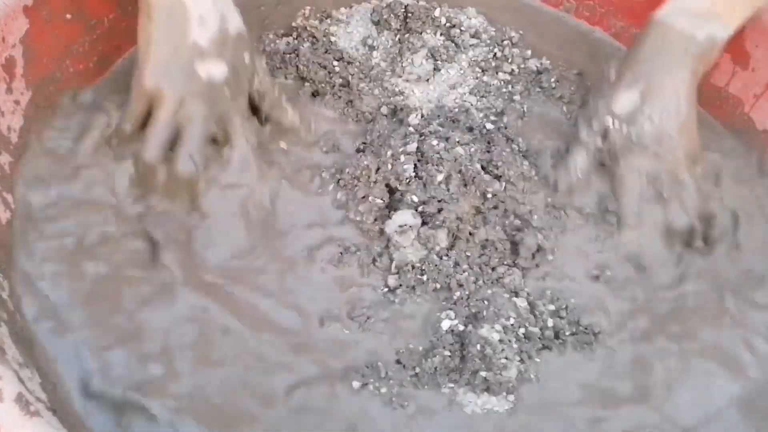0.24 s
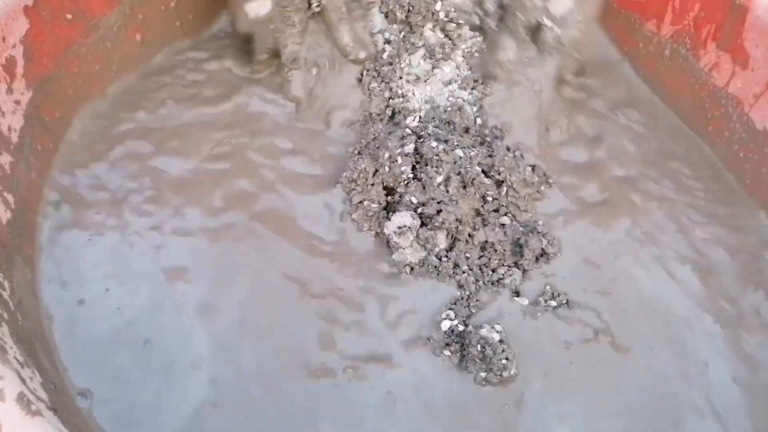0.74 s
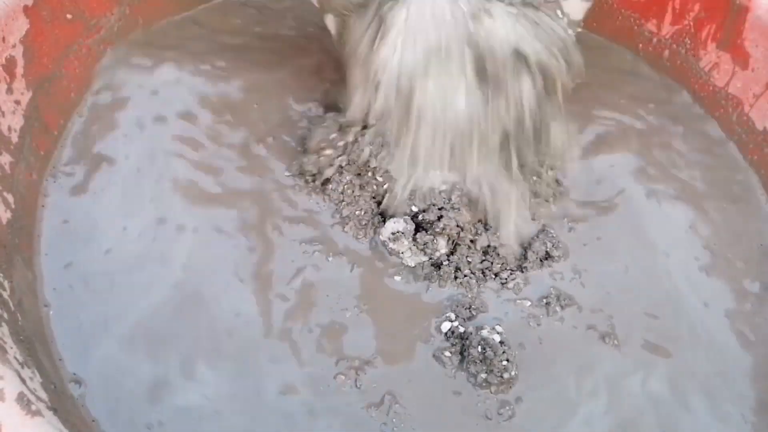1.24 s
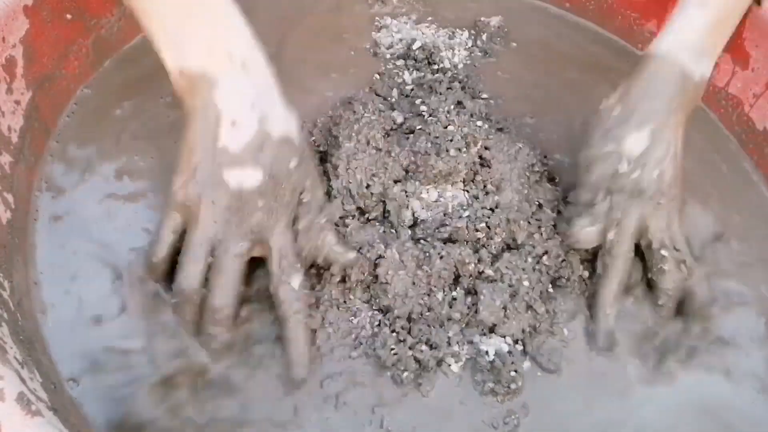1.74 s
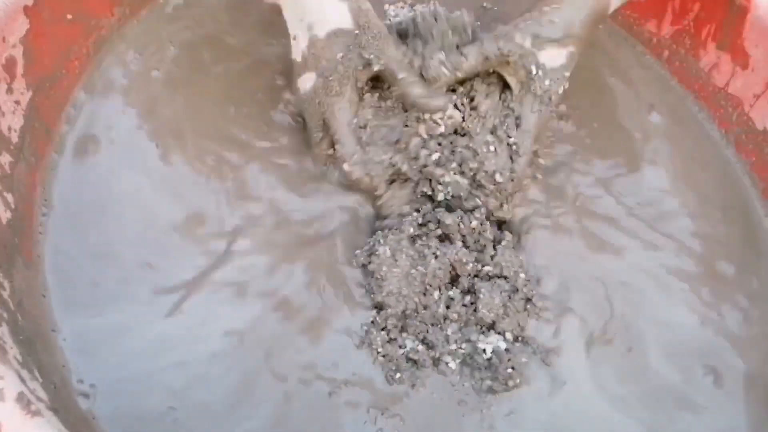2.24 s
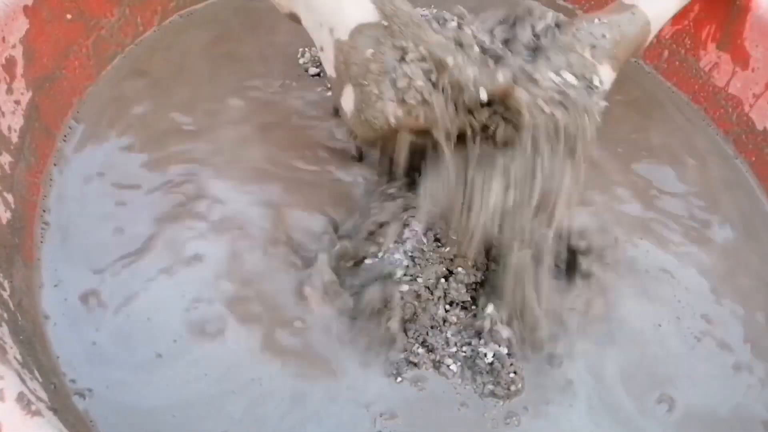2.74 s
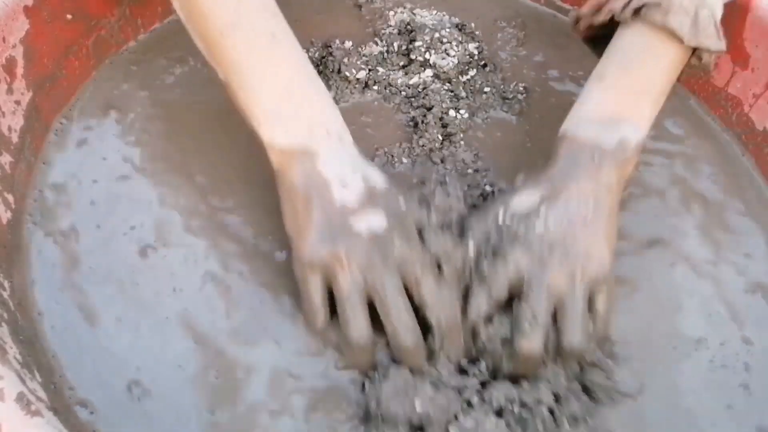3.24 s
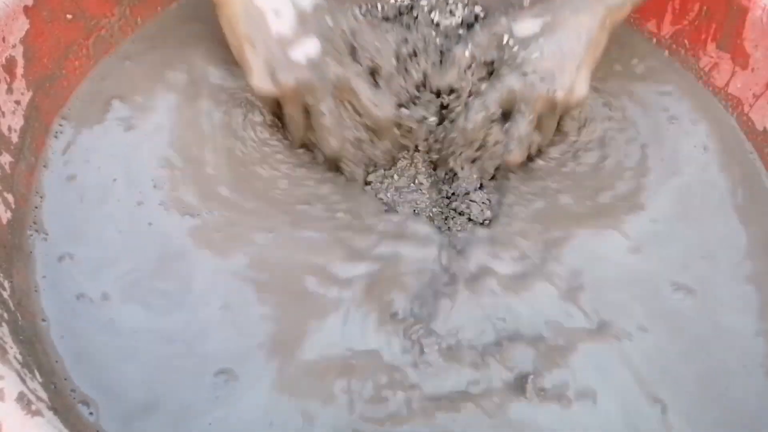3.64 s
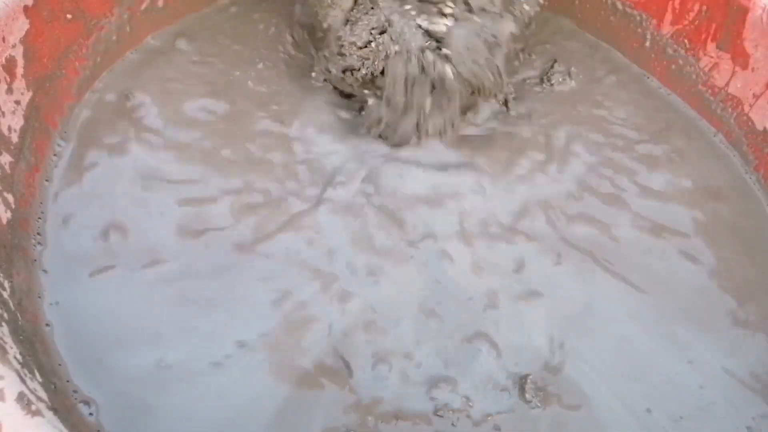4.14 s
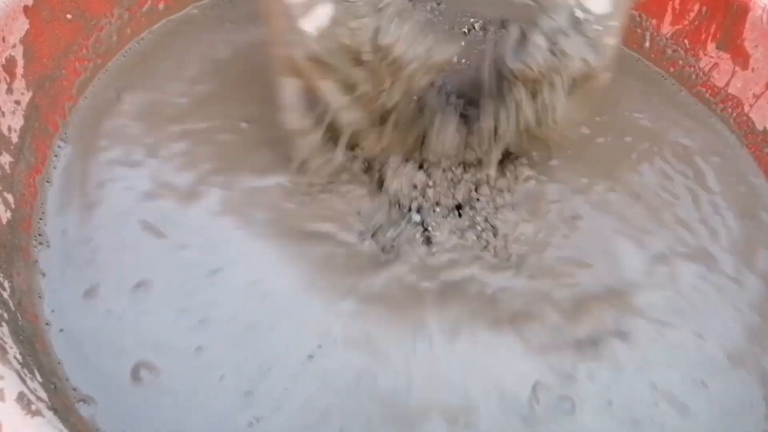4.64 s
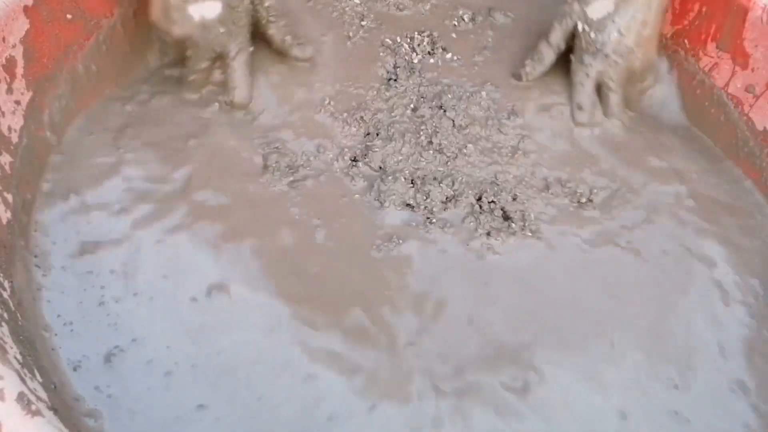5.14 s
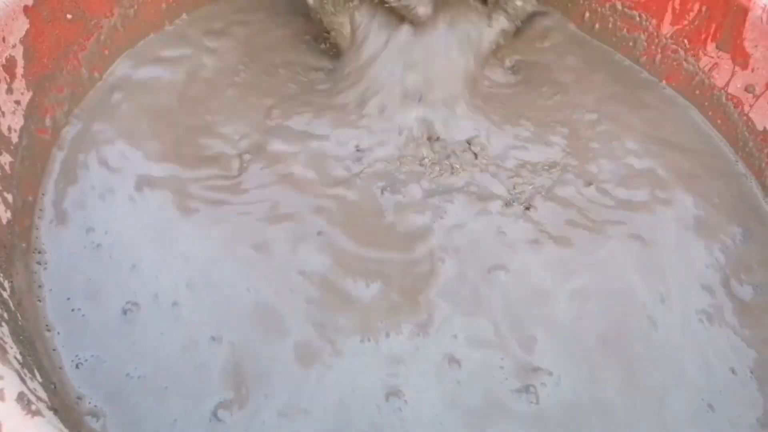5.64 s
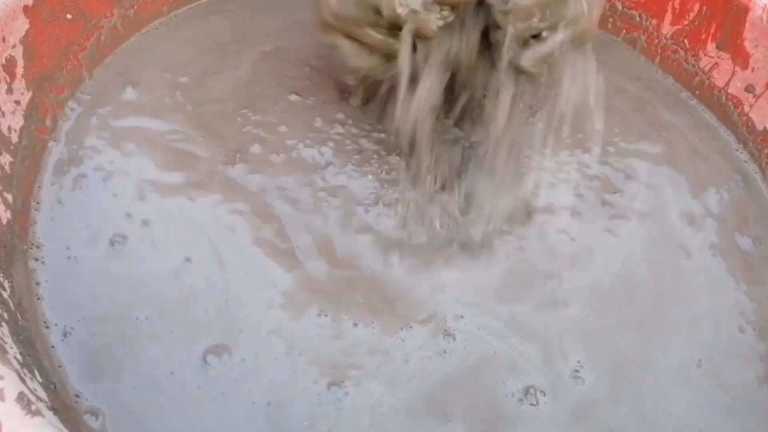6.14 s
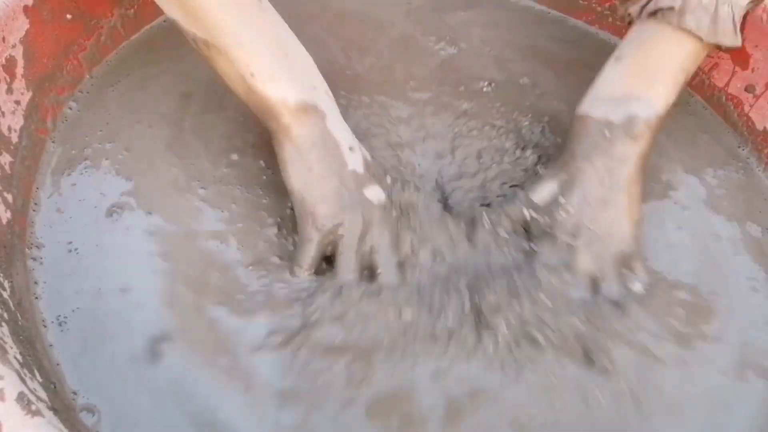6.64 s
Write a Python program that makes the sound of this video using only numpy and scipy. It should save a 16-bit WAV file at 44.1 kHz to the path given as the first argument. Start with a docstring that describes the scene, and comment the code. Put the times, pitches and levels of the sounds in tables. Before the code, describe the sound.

Close sloshing and gulping of muddy water as handfuls of grainy sand pour in, over a low, wavering far-off motor hum.

```python
"""Gritty sand in a basin of muddy water

Close to the microphone, hands lift wet sand out of a basin and crumble it back in, again and again.
Moving resonances slosh and froth, ringing bubbles plop and gulp, filtered noise and clicks hiss as grains.
Far off, two engines drone as sums of orders and drift in speed; rumble and open air lie behind them.
The microphone has two closely spaced ports, partly alike in what they hear."""
import sys
import numpy as np
from scipy import signal
from scipy.fft import rfft, irfft
from scipy.io import wavfile
from scipy.ndimage import uniform_filter1d

SR = 44100
rng = np.random.default_rng(int(sys.argv[2]) if len(sys.argv) > 2 else 0)


def to_wav(sig):
    """Store sig (one row per channel, or 1-D mono) as 16-bit WAV at the path in sys.argv[1].

    Samples outside -1..1 are clipped; the rate is SR.
    """
    pcm = np.clip(np.atleast_2d(sig), -1, 1) * 32767
    pcm = np.round(pcm).astype(np.int16)
    wavfile.write(sys.argv[1], SR, pcm.T)  # frames by channels


N = 303849
TIME = np.arange(N) / SR  # s

# Handfuls of grains raining on the water:
# [full flow t/s, relative level/dB, rise/s, hold/s, fall/s, left minus right/dB]
POURS = [(0.0, -30, .1, 0.052, 0.079, -1.5), (0.148, -32, 0.13, 0.085, 0.12, -3.5),
         (0.85, -44.5, 0.99, 0.062, 0.44, -8), (1.325, -32, 0.52, 0.35, 0.54, -1.5),
         (1.966, -50, 0.15, 0.036, 1, -17), (2.606, -29.5, 0.34, 0.42, 0.17, -2.5),
         (3.171, -32.5, 0.18, 0.011, 0.038, -3), (3.439, -28, 0.13, 0.17, 0.15, -3),
         (3.904, -41.5, 0.63, 0.038, 0.097, -8.5), (4.551, -29.5, 0.61, 0.2, 0.23, -3.5),
         (5.433, -46.5, 0.6, 0.041, 0.92, -7), (5.987, -30.5, 0.31, 0.31, 0.24, -1.5),
         (6.465, -40, 0.2, 0.12, 0.34, -4)]
STRAY_DB = -54  # grains that keep falling from the fingers
TRICKLE_DB, TRICKLE_STRETCH = -30, 1.4  # trickle against its pour, and how many times slower it sets in
LOOSEN_DB_PER_S = 10.5  # the flow grows as the handful falls apart

# Sand plunging in and frothing: [height t/s, relative level/dB, rise/s, fall/s, ring of the bubble cloud f/Hz]
PLUNGES = [(0.02, -39.5, 0.11, 0.15, 2240), (0.27, -38.5, 0.22, 0.22, 2100), (1.35, -36, 0.88, 0.96, 2870),
           (2.08, -36.5, 0.23, 0.14, 1600), (2.57, -30.5, 0.11, 0.28, 1400), (2.71, -30.5, 0.47, 0.4, 2800),
           (3.16, -31.5, 0.13, 0.11, 1890), (3.39, -27, 0.056, 0.68, 1740), (3.54, -25.5, 0.24, 0.32, 2680),
           (3.95, -45, 0.092, 0.28, 2900), (4.27, -34.5, 0.078, 0.14, 1480), (4.49, -28, 0.42, 0.45, 3020),
           (5.6, -41, 0.35, 0.34, 2000), (6.025, -30.5, 0.32, 0.28, 2630), (6.61, -38, 0.36, 0.19, 1260)]
FROTH_OCTAVES_PER_S = 1  # the large bubbles burst first

# A hand pushing the water about: [height t/s, level/dB, rise/s, fall/s, centre of the gurgle f/Hz]
SLOSHES = [(0.7, -35.5, 0.62, 0.63, 730), (1.3, -39.5, 0.52, 0.29, 540), (2.13, -39, 0.4, 0.8, 676),
           (2.561, -38.5, 1, 0.37, 690), (3.38, -39.5, 0.37, 0.23, 895), (3.6, -38.5, 0.97, 0.35, 544),
           (4.0, -41, 0.97, 0.48, 880), (4.34, -36, 0.27, 0.41, 560), (5.31, -35.5, 0.44, 0.61, 1010),
           (5.8, -42, 0.5, 0.55, 850), (6.87, -44, 0.64, 0.52, 674)]
GURGLE_OCTAVES_PER_S = .7  # the gurgle climbs as the hand comes up
LAPPING_DB, LAPPING_HZ = -53, 880  # the water never quite settles
ROUNDNESS = 1.065  # above 1 a gesture has a rounder top and steeper ends

# Water closing over a pocket of air, which breaks into bubbles of one size:
# [height t/s, level/dB, fall/s, pitch f/Hz]
GULPS = [(0.66, -41, 0.38, 866), (0.83, -37, 0.13, 955), (1.342, -34, 0.065, 1540),
         (1.38, -38.5, 0.18, 1200), (1.42, -42.5, 0.35, 1956), (2.083, -41, 0.078, 2430),
         (2.48, -40, 0.2, 1485), (3.378, -28.5, 0.093, 1292), (3.444, -30, 0.18, 2603),
         (3.527, -26.5, 0.041, 2640), (4.46, -35, 0.19, 1590), (4.491, -37.5, 0.15, 1191),
         (5.16, -37, 0.12, 522), (5.19, -38.5, 0.24, 890), (5.365, -40, 0.044, 2444),
         (5.35, -35, 0.2, 1075), (5.525, -34, 0.061, 960), (6.125, -39, 0.22, 2790)]
GULP_WIDTH, GULP_BUBBLES_PER_S = 0.26, 450  # width of the ring as a share of its pitch
GULP_RISE = 1  # rise time as a share of the fall time

# Lumps that trap a pocket of air: [t/s, peak level before echoes/dB, pitch f/Hz]
PLOPS = [(0.1505, -29, 3270), (0.225, -23, 2250), (0.226, -30, 1750), (0.2927, -22.5, 3300),
         (0.293, -30, 1410), (1.341, -19, 1474), (2.059, -29.5, 1300), (3.342, -17, 1267),
         (3.391, -22, 1120), (3.436, -23.5, 1210), (4.603, -22, 1470), (5.2975, -24, 925),
         (5.807, -32, 3650), (6.02, -26.5, 1460), (6.251, -37, 1480)]

# Crumbs snapping and spattering: [t/s, relative level/dB, decay of the spray/s]
SNAPS = [(0.0238, -10.5, .0007), (0.057, -17, 0.0054), (0.067, -9, .0014), (0.2776, -24.5, .002),
         (0.4144, -30.5, .002), (1.338, -19, 0.007), (1.352, -15.5, .0028), (1.4172, -20.5, .005),
         (1.508, -18.5, 0.0045), (1.6323, -23, .004), (1.849, -18.5, 0.0021), (2.973, -19.5, 0.013),
         (4.719, -20.5, .009), (6.2196, -16, 0.0076), (6.2497, -13.5, 0.0031), (6.195, -26, 0.018),
         (6.265, -28, 0.019), (6.345, -24, .008)]

# Speed of the engine that gathers pace throughout: [t/s, turning rate f/Hz]
CLIMBING_SPEED = [(0.0, 30.2), (0.72, 32.0), (1.7, 33.7), (2.5, 35.1), (3.9, 36.6), (4.8, 37.8),
                  (6.88, 38.9)]
# Its boom, swelling and shifting among the low orders: [t/s, level/dB, centre of the boom f/Hz]
CLIMBING_BOOM = [(0.0, -41.5, 92), (0.3, -28.5, 87.7), (0.57, -23, 86), (0.68, -28, 183.6),
                 (1.06, -26.5, 135.5), (1.32, -29.5, 163), (1.42, -36.5, 148), (1.72, -27, 174),
                 (1.96, -41, 166), (2.44, -26, 174), (3.15, -44.5, 168), (3.35, -26.5, 165),
                 (3.6, -37, 174), (4.1, -33, 191), (5.502, -36, 183), (6.3, -42, 196), (6.779, -32, 176)]
# Speed of the engine that comes in later and slows down: [t/s, turning rate f/Hz]
SLOWING_SPEED = [(1.6, 32.0), (1.96, 30.8), (2.28, 30.5), (3.4, 28.2), (4.52, 25.7), (5.4, 22.5),
                 (5.8, 22.0)]
# Its boom: [t/s, level/dB, centre of the boom f/Hz]
SLOWING_BOOM = [(1.5, -52, 125), (1.72, -23, 127), (1.95, -27.5, 122), (2.13, -21, 120),
                (2.371, -27, 137.6), (2.52, -37.5, 148), (2.72, -30.5, 154), (3.031, -34, 116),
                (3.2, -29, 92), (3.37, -24.5, 133.5), (3.68, -36, 125), (3.83, -26, 124), (3.98, -27, 119),
                (4.13, -20.5, 137), (4.36, -26.5, 113), (4.7, -32.5, 133), (5.2, -31.5, 107),
                (6.0, -40.5, 110)]
# Orders of both engines: [multiple of the turning rate, level outside the boom/dB]
ENGINE_ORDERS = [(2, -14), (3, 1), (4, 2.5), (5, -1), (6, -7), (7, -20), (8, -14), (9, -15)]
BOOM_OCTAVES, BOOM_DB = 0.13, 11.5  # width of the boom, and how far it lifts an order
ENGINE_LOW_CUT_HZ = 83  # orders that sink below this fade

# Spectral colours of grains, bubbles, stirred water, exhaust and open air: [f/Hz, relative level per Hz/dB]
GRIT_COLOUR = [(1470, -63), (2500, -22), (3130, -7.5), (3790, -14), (4260, -13.5), (5320, -4.5), (6560, 2),
               (7190, 6), (7770, 0.5), (8590, 1.5), (9950, -7), (10800, -11.5), (12900, -15.5),
               (14700, -19), (15800, -15)]
FROTH_COLOUR = [(450, -37), (850, 0), (1200, 0.5), (1950, 0), (2700, 0), (3350, 1.5), (3800, -7.5),
                (5300, 2.5), (7500, -22), (12000, -45)]
SLOSH_COLOUR = [(340, 5), (470, 6.5), (650, 5), (950, 3), (1250, -0.5), (1700, -8), (3000, -9), (6000, -27)]
RUMBLE_COLOUR = [(25, -15.5), (52, -2.5), (68, -5.5), (110, -1.5), (160, -2.5), (205, -3), (250, -19.5),
                 (330, -16.5), (600, -47.5)]
AIR_COLOUR = [(160, 4), (280, 7), (399, -26), (696, -6), (2730, -7), (4030, -15), (7030, -8), (10900, -61),
              (14800, -46), (15800, -39)]

# How alike the two ports hear: [f/Hz, likeness 0-1]
PORT_LIKENESS = [(120, .78), (250, .8), (500, .62), (1200, .68), (2500, .48), (5000, .48), (7000, .72),
                 (12000, .86)]
# Balance of the two ports: [f/Hz, left minus right/dB]
PORT_BALANCE = [(100, -2.5), (1500, -2.5), (2600, 0.5), (3600, -0.5), (5000, 0), (6500, -6), (7400, 1.5),
                (7750, 0), (8600, 12.5), (10000, 4.5), (13000, 2.5)]
EDGE_HZ = 15800  # upper band limit of the recorder


def grit(level_db, pan_db):
    """Wet grains hiss and raise tiny bubbles, dry ones prickle; each falls in its own uneven clumps."""
    fizz = bubbles(4000, 12000, per_s=1200, cycles=16, rise=.02, spread_db=1.2, count=14)
    wet = coloured(rng.standard_normal((2, N)) + 0.36 * fizz, GRIT_COLOUR)
    wet = wet * amp(-2.0 + 1.84 * drift(rate_hz=25))
    dry = dry_grains(impacts(per_s=2200, spread_db=1.0))
    dry = dry * amp(-3.5 + 1.6 * drift(rate_hz=60))
    return (wet + dry) * amp(level_db + np.array([pan_db, -pan_db]) / 2)


def sand_flow():
    """Level and side (dB) of the falling grains: each handful trickles, pours and runs out."""
    power = np.full(N, amp(STRAY_DB) ** 2)
    side = np.zeros(N)
    for s, db, rise, hold, fall, side_db in POURS:
        loosen_db = LOOSEN_DB_PER_S * (np.clip(TIME - s, 0, hold) - hold / 2)
        pour = swell(TIME, s, rise, fall, hold)
        trickle = amp(TRICKLE_DB) ** 2 * swell(TIME, s, rise * TRICKLE_STRETCH, fall, hold)
        part = amp(db + loosen_db) ** 2 * (pour + trickle)
        power = power + part
        side = side + part * side_db
    return 10 * np.log10(power), side / power


def dry_grains(x):
    """Dry grains strike more brightly than wet ones."""
    return coloured(x - 0.71 * np.roll(x, 1, axis=1), GRIT_COLOUR)


def froth():
    """Plunging sand sheds its air as a swarm of small bubbles."""
    cloud = bubbles(927.6, 5766, per_s=4500, cycles=9.3, rise=0.017, spread_db=0.1, count=28)
    swarm = cloud + 1.6 * impacts(12000, spread_db=1.6)
    moving = churn(swarm, FROTH_COLOUR, PLUNGES, FROTH_OCTAVES_PER_S,
                   ring_db=3.5, octaves=0.57, patchy_db=2.5)
    return amp(-3.0) * moving


def slosh():
    """The hands drag through the water and fold large bubbles into it; a few ring on as gurgles."""
    cloud = bubbles(281.6, 3094, per_s=2500, cycles=3.55, rise=0.098, spread_db=0.5, count=24)
    gurgles = bubbles(451.7, 2665, per_s=350, cycles=14.9, rise=0.0373, spread_db=1.0, count=16)
    stirred = .5 * cloud + .25 * gurgles + rng.standard_normal((2, N))
    moving = churn(stirred, SLOSH_COLOUR, SLOSHES, GURGLE_OCTAVES_PER_S,
                   ring_db=5.5, octaves=0.66, patchy_db=1.0)
    return moving * amp([[1.7], [-1.7]])  # leans left


def gulps():
    """Bubbles of one size are born unevenly and ring together; their pitch climbs as they rise."""
    out = np.zeros((2, N))
    t = np.arange(SR) / SR - .5
    for s, db, fall, hz in GULPS:
        born = rng.random((2, SR)) < GULP_BUBBLES_PER_S / SR
        births = np.exp(2j * np.pi * rng.random((2, SR))) * born  # each with its own phase
        keep = np.exp(-np.pi * GULP_WIDTH * hz / SR)
        rings = signal.lfilter([1], [1, -2 * keep, keep ** 2], births)
        rings = rings / (abs(rings) + 1e-9) ** .5  # the pocket feeds them at an even pace
        turns = np.cumsum(hz * 2 ** (GURGLE_OCTAVES_PER_S * t)) / SR
        ring = unit((rings * np.exp(2j * np.pi * turns)).real)
        envelope = np.sqrt(swell(t, 0, GULP_RISE * fall, fall))
        add(out, s + t[0], amp(db) * envelope * ring)
    return np.sqrt(2) * irfft(ports(rfft(out), np.fft.rfftfreq(N, 1 / SR)), N)


def plops():
    """Each lump opens one large bubble, then a short flurry of bubbles of nearly the same size."""
    out = np.zeros((2, N))
    for s, db, hz in PLOPS:
        flurry = np.zeros((2, SR // 4))
        add(flurry, 0, np.ones((2, 1)) * bubble(hz, cycles=6.6, rise=0.0057))
        for delay, (size, left, right) in zip(rng.gamma(2, size=14), rng.standard_normal((14, 3))):
            port_gain = 1 + 1.24 * np.array([[left], [right]])
            small = bubble(hz * 1.15 ** size, cycles=5, rise=0.01)
            add(flurry, delay * .006, .45 * np.exp(-delay / 2) * port_gain * small)
        add(out, s, amp(db) * flurry / abs(flurry).max())
    return out


def snaps():
    """A crumb bursts: a spray of dry grit and a wet splat that fade over milliseconds."""
    out = np.zeros((2, N))
    t = np.arange(4096) / SR
    for s, db, decay in SNAPS:
        spray = dry_grains(rng.standard_normal((2, len(t))))
        splat = amp(-17.0) * coloured(rng.standard_normal((2, len(t))), FROTH_COLOUR)
        envelope = (1 - np.exp(-5 * t / decay)) * np.exp(-t / decay)
        add(out, s, amp(db) * (spray + splat) * envelope)
    return out


def basin(x, t60, wet_db):
    """The basin wall and the ground return a brief scatter of echoes, 60 dB down after t60 seconds."""
    t = np.arange(SR // 5) / SR
    sparse = rng.standard_normal((2, len(t))) * (rng.random((2, len(t))) < .05)
    taps = sparse * amp(-60 * t / t60) * (t > .002)
    echoes = signal.oaconvolve(x, taps / np.linalg.norm(taps[0]), axes=1)[:, :N]
    return x + amp(wet_db) * echoes


def engines():
    """Two far engines, one to each side, over their exhaust rumble."""
    climbing = engine(CLIMBING_SPEED, CLIMBING_BOOM, wobble=0.012, flutter_db=2.0, side_db=3.0, lead_rad=0.13)
    slowing = engine(SLOWING_SPEED, SLOWING_BOOM, wobble=0.0063, flutter_db=2.33, side_db=-3.0, lead_rad=0.039)
    rumble = amp(-38.0) * coloured(rng.standard_normal((2, N)), RUMBLE_COLOUR)
    return climbing + slowing + rumble


def engine(speed, boom, wobble, flutter_db, side_db, lead_rad):
    """Only the low orders carry this far; a shifting boom lifts them in turn, and each wavers a little."""
    hz, = curves(speed, TIME)
    level_db, boom_hz = curves(boom, TIME)
    turns = np.cumsum(hz * (1 + wobble * drift(rate_hz=16.4))) / SR
    # the left port leads in phase by a drifting amount
    lead = np.array([[1], [-1]]) * (lead_rad + 0.098 * drift(rate_hz=1.9))
    knots = np.linspace(0, TIME[-1], N // 3000)
    out = np.zeros((2, N))
    power = np.zeros(N)  # the orders share the engine's level
    for k, db in ENGINE_ORDERS:
        lift = np.exp(-.5 * (np.log2(k * hz / boom_hz) / BOOM_OCTAVES) ** 2)
        gain = amp(db + BOOM_DB * lift)
        gain = gain / np.sqrt(1 + (ENGINE_LOW_CUT_HZ / (k * hz)) ** 10)
        flutter = amp(flutter_db * np.interp(TIME, knots, rng.standard_normal(len(knots))))
        # nearly in step, so each firing throbs
        phase = 2 * np.pi * (k * turns + rng.random() / 3) + lead
        out += gain * flutter * np.sin(phase)
        power += gain ** 2
    return amp(level_db + np.array([[side_db], [-side_db]]) / 2) * out / np.sqrt(power / 2)


def open_air():
    """Distant sound comes from all sides, so it differs more between the ports."""
    air = coloured(rng.standard_normal((2, N)), AIR_COLOUR)
    band = signal.butter(1, [400, 4000], "bandpass", fs=SR, output="sos")
    diffuse = signal.sosfilt(band, air[0] - air[1])
    return amp(-45) * (air + 1.1 * np.array([diffuse, -diffuse]))


def churn(x, colour, rows, octaves_per_s, ring_db, octaves, patchy_db):
    """Water in motion: a colour, a broad moving resonance, and patches where bubbles bunch up."""
    hz, t, z = signal.stft(x, SR, nperseg=512, noverlap=384)
    hz = hz[:, None]
    level_db, ring_hz = strokes(rows, t, octaves_per_s)
    ring = np.exp(-.5 * (np.log2((hz + 1) / ring_hz) / octaves) ** 2)
    patches = uniform_filter1d(rng.standard_normal(z.shape[1:]), size=5, axis=0)
    patches = unit(uniform_filter1d(patches, size=9, axis=1))
    shape = amp(read(colour, hz) + ring_db * ring)
    shape = shape / np.linalg.norm(shape, axis=0) * amp(patchy_db * patches)
    y = signal.istft(ports(z, hz) * shape, SR, nperseg=512, noverlap=384)[1][:, :N]
    return y / np.std(y.mean(0)) * amp(np.interp(TIME, t, level_db))


def strokes(rows, t, octaves_per_s):
    """Level (dB) and ring (Hz) of stirred water: the strokes add up, and the strongest sets the pitch."""
    power = np.full(len(t), amp(LAPPING_DB) ** 2)
    pitch = power * np.log2(LAPPING_HZ)
    for s, db, rise, fall, hz in rows:
        part = amp(db) ** 2 * swell(t, s, rise, fall)
        power = power + part
        pitch = pitch + part * (np.log2(hz) + octaves_per_s * (t - s))
    return 10 * np.log10(power), 2 ** (pitch / power)


def swell(t, s, rise, fall, hold=0):
    """Power of one gesture: it grows by 20 dB in the rise time, holds, and loses 20 dB in the fall time."""
    away = np.maximum(s - t, 0) / rise + np.maximum(t - s - hold, 0) / fall
    return amp(-20 * away ** ROUNDNESS) ** 2


def bubble(hz, cycles, rise):
    """A pocket of air rings for some cycles and rises in pitch as it nears the surface."""
    age = np.arange(int(5 * cycles / hz * SR)) * hz / cycles / SR  # in decay times
    tone = np.sin(2 * np.pi * cycles * (age + rise * age ** 2 / 2))
    return tone * np.exp(-age) * (1 - np.exp(-8 * age))


def bubbles(low_hz, high_hz, per_s, cycles, rise, spread_db, count):
    """A cloud of bubbles of many sizes, each born at its own moments."""
    births = impacts(per_s, spread_db)
    kind = rng.integers(0, count, N)
    out = np.zeros((2, N))
    for k, hz in enumerate(np.geomspace(low_hz, high_hz, count)):
        ring = bubble(hz, cycles, rise)[None]
        out += hz * signal.oaconvolve(births * (kind == k), ring, axes=1)[:, :N]
    return unit(out)


def impacts(per_s, spread_db):
    """Two trains of clicks at random moments: many small, a few large."""
    size = amp(spread_db * np.minimum(rng.exponential(1, N), 5))
    return unit(rng.standard_normal((2, N)) * size * (rng.random(N) < per_s / SR))


def drift(rate_hz):
    """Slow chance of rms 1, up to the given rate."""
    lowpass = 1 + (np.fft.rfftfreq(N, 1 / SR) / rate_hz) ** 4
    return unit(irfft(rfft(rng.standard_normal(N)) / lowpass, N))


def coloured(x, colour):
    """Gives a pair of signals a fixed colour at the ports; their mean has rms 1."""
    hz = np.fft.rfftfreq(x.shape[1], 1 / SR)
    y = irfft(ports(rfft(x) * amp(read(colour, hz)), hz), x.shape[1])
    return y / np.std(y.mean(0))


def ports(z, hz):
    """Two unrelated spectra become the partly alike signals at the two microphone ports."""
    same = np.clip(read(PORT_LIKENESS, hz), 0, .99)
    mid = np.sqrt(1 + same) * z[0]
    side = np.sqrt(1 - same) * z[1]
    lean = amp(read(PORT_BALANCE, hz) / 2)
    pair = np.array([(mid + side) * lean, (mid - side) / lean])
    return pair / np.sqrt(lean ** 2 + lean ** -2 + 2 * same)


def amp(db):
    """Decibels to gain."""
    return 10 ** (np.asarray(db) / 20)


def unit(x):
    """Scales to rms 1."""
    return x / np.sqrt(np.mean(x ** 2) + 1e-20)


def read(points, hz):
    """A spectrum table on a log-frequency axis."""
    f, value = np.transpose(points)
    return np.interp(np.log(hz + 1), np.log(f + 1), value)


def curves(rows, t):
    """Each column of a curve table at the times t."""
    s, *columns = np.transpose(rows)
    return [np.interp(t, s, c) for c in columns]


def add(mix, s, sound):
    """Mixes a stereo sound in at time s."""
    part = mix[:, max(round(s * SR), 0):][:, :sound.shape[1]]
    part += sound[:, :part.shape[1]]


def scene():
    """The work in the basin close by, over the far engines and the open air."""
    flow_db, side_db = sand_flow()
    work = grit(flow_db, side_db) + froth() + slosh() + gulps() + plops() + snaps()
    return basin(work, t60=.1, wet_db=-11) + engines() + open_air()


def record(dry):
    """The recorder's band limit: a steep low-pass filter."""
    lowpass = signal.firwin(511, EDGE_HZ, window=("kaiser", 9), fs=SR)
    return signal.oaconvolve(dry, lowpass[None], "same")


dry = scene()
out = record(dry)
to_wav(out)
```